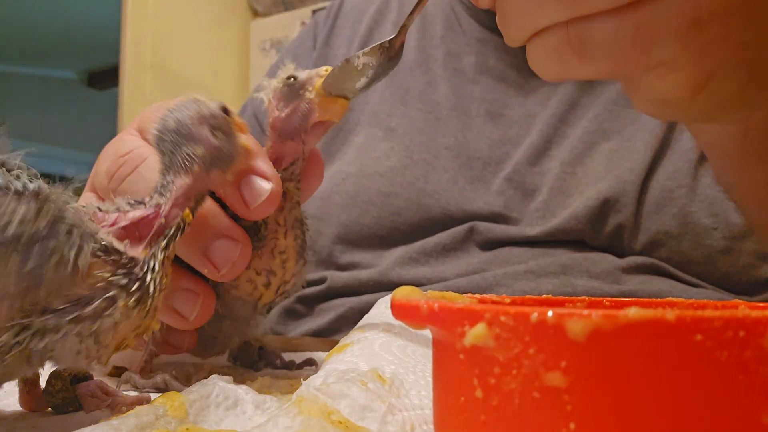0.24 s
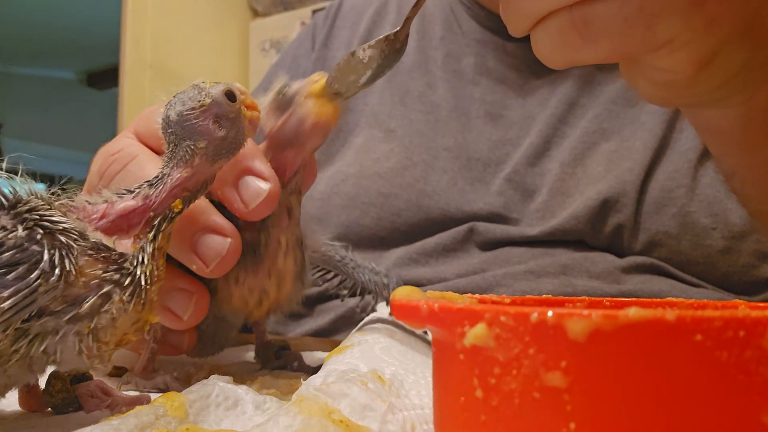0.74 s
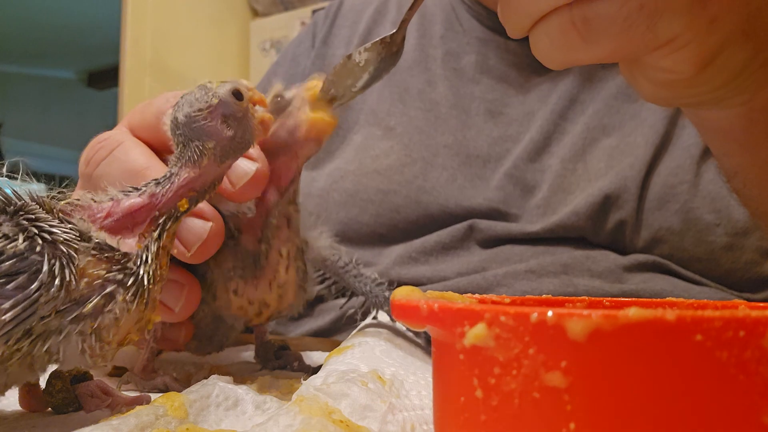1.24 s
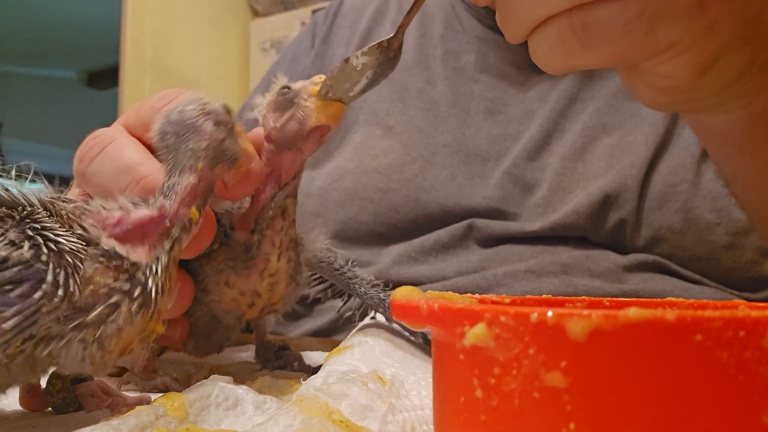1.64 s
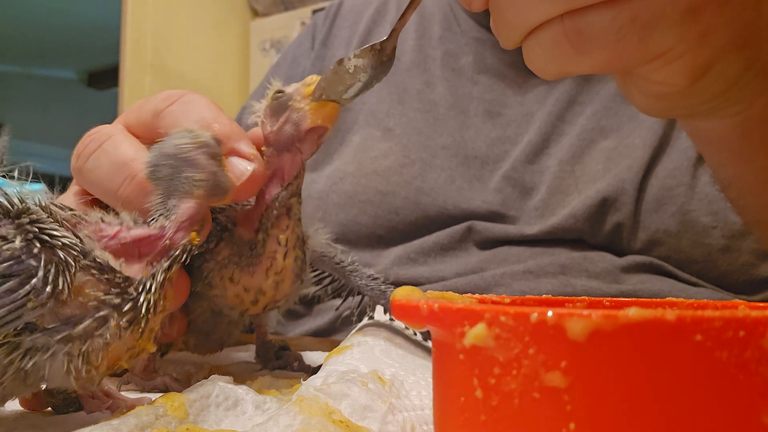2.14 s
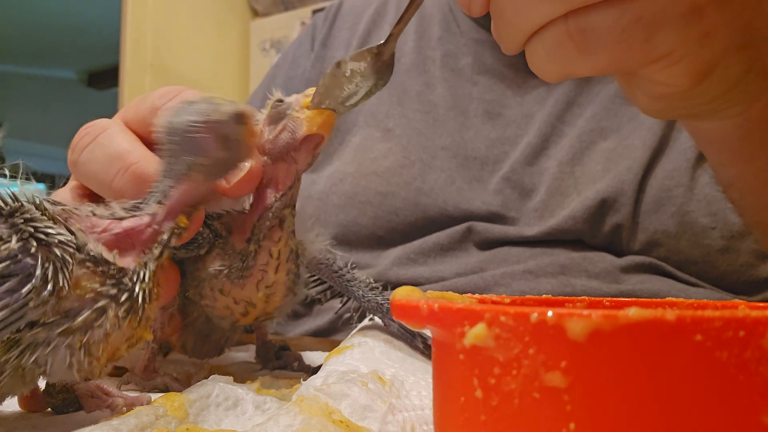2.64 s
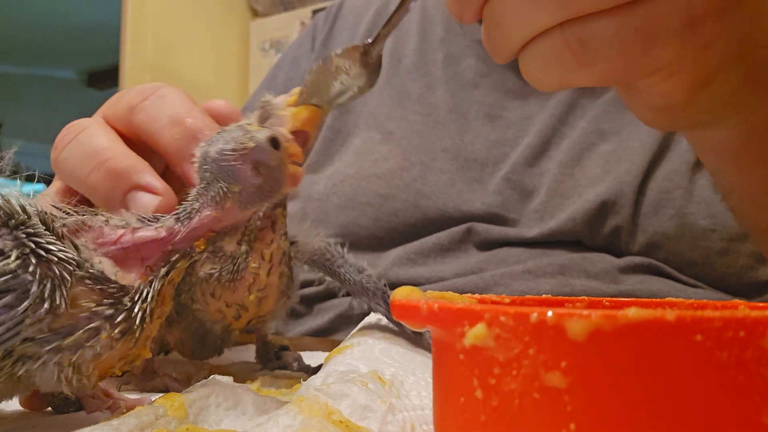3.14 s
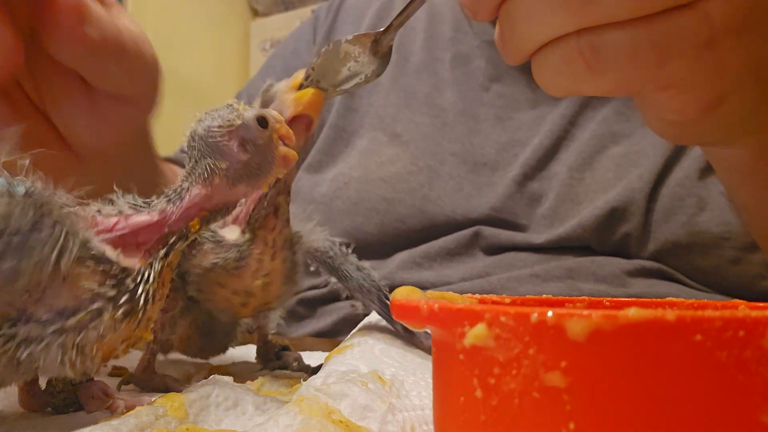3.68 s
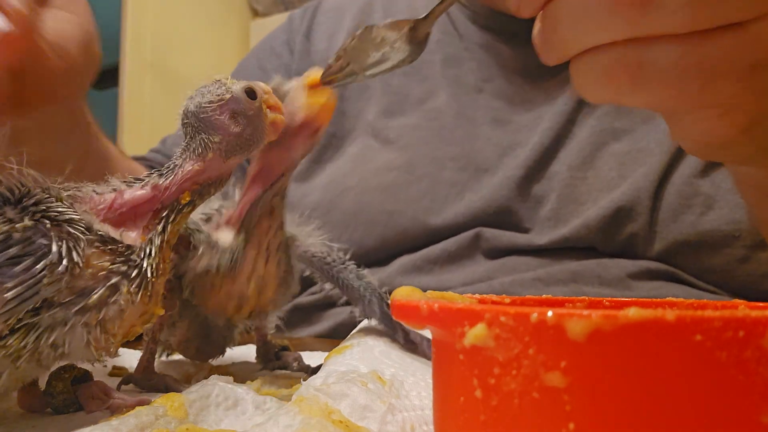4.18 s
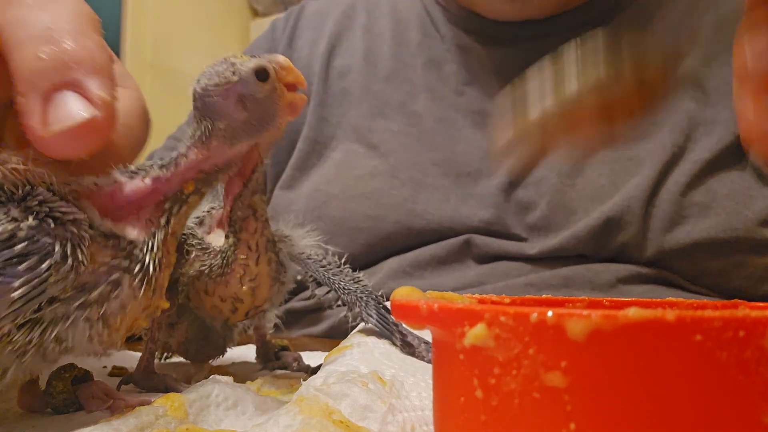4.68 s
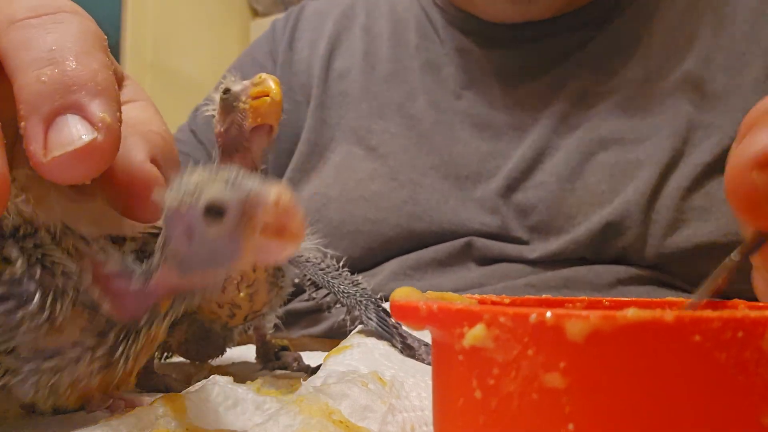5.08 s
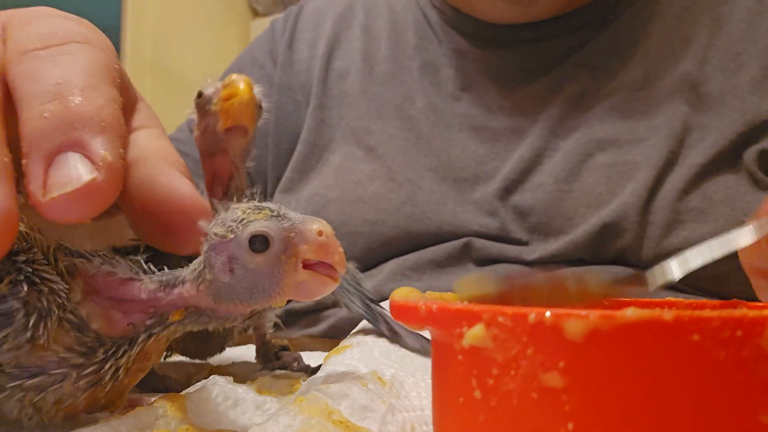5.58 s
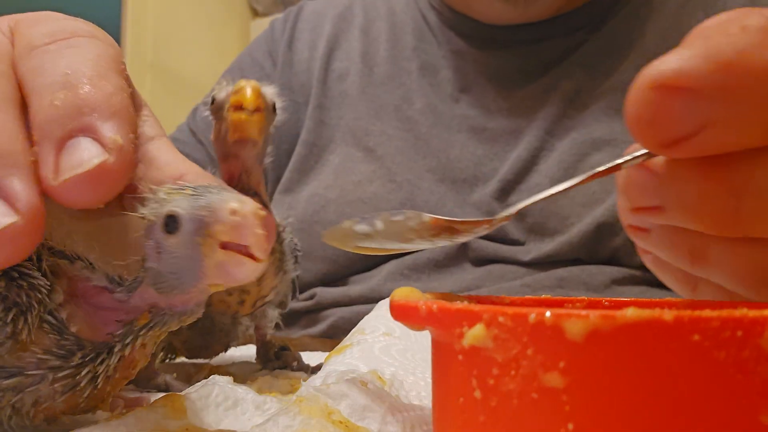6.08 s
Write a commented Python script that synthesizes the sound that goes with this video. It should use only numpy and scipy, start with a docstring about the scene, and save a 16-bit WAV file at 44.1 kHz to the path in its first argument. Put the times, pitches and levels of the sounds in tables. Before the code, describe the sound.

Close stereo pickup at a table where young parrots are spoon-fed. Low unsteady hum and soft room hiss run underneath. One near chick squawks at the start, then three more times at intervals of roughly two seconds, whistle cracking to rasp and back. A stronger rustle with faint peeps comes midway, another later, and light ticks precede the last call. Short, diffuse room reverberation.

```python
"""A parrot chick begs four times close to a phone on a kitchen table: a whistle near 2 kHz, made of harmonic
partials, breaks down into a rasp of air gated once a cycle, and returns. At times the other side of the syrinx
joins and beats with it. Far chicks peep faintly as gliding sines, and paper and spoon make resonant noise
rustles and damped ticks. An appliance hums in wavering lines over the air noise of a small diffuse room."""
import sys
import numpy as np
from scipy import signal
from scipy.fft import rfft, irfft
from scipy.io import wavfile
from scipy.ndimage import uniform_filter1d

SR = 44100
rng = np.random.default_rng(int(sys.argv[2]) if len(sys.argv) > 2 else 0)


def to_wav(s):
    """Save 16-bit WAV."""
    ch = np.atleast_2d(s).T  # columns
    pcm = np.round(np.clip(ch, -1, 1) * 32767)  # PCM
    wavfile.write(sys.argv[1], SR, pcm.astype(np.int16))


N = 278712

# Air noise of the room: frequency_hz, density_db (relative), left_minus_right_db, likeness_of_sides (0-1)
AIR_SPECTRUM = [(25, -15, 19, .9), (60, -25.5, -21.5, 0.6), (129, -4.5, 12, 0), (250, 1, 2, 1),
                (500, -3, 3.5, 0.3), (800, -8, 0.5, 0.5), (1300, -14, -0.5, 0), (2030, -14, 0, 0.18),
                (2780, -18, 0.5, 0), (4640, -18.5, 6.5, 0), (9200, -22.5, 4, 0.07), (8670, -24, 22.5, 0),
                (12000, -51, -11.5, 0.58), (16000, -33.5, 1, 0.08)]
# Bands where the air hiss stands out: frequency_hz, rise_db
HISS_BANDS = [(2150, 4), (4800, 4), (5900, 4), (7700, 3)]
AIR_LEVEL_DB, HISS_BAND_WIDTH_HZ = -50, 150
# Appliance hum lines: frequency_hz, level_db, left_minus_right_db, waver_db
HUM_LINES = [(59.2, -66, 3, 4), (92.7, -57, -6, 3.5), (166.8, -63.5, -1, 3.5), (198.7, -48.5, 1.5, 1.6),
             (397, -70, -1.5, 3)]

# Whistled peeps of far chicks: start_s, length_s, start_hz, end_hz, level_db
FAR_PEEPS = [(.47, .05, 4300, 4500, -67), (.525, .05, 4200, 4400, -67), (.58, .05, 4200, 4400, -68),
             (.62, .14, 4400, 4350, -69), (2.468, .025, 2400, 2400, -58), (2.478, .06, 3850, 3900, -57),
             (2.485, .11, 2850, 3100, -57), (2.515, .025, 5950, 6000, -59), (2.59, .08, 3200, 3200, -64),
             (2.73, .05, 3750, 3700, -64), (2.755, .13, 3050, 3000, -65), (2.825, .04, 2000, 2100, -62),
             (2.87, .09, 2150, 2100, -59), (3.0, .04, 3300, 3300, -63), (4.065, .07, 2200, 2200, -64),
             (4.07, .08, 4700, 4500, -63), (5.21, .045, 3000, 2800, -62), (6.09, .06, 3500, 3200, -67),
             (6.145, .05, 3850, 3750, -62)]
FAR_ROOM_SEND_DB = 15

# Paper and spoon rustles: peak_time_s, rise_s, fall_s (time constants), centre_hz, width_hz, gain_db
RUSTLE_EVENTS = [(0.02, 0.079, 0.024, 4830, 6000, -45), (1.09, 0.065, 0.089, 4070, 2900, -43.5),
                 (1.352, 0.0039, 0.039, 5060, 5700, -43), (2.505, 0.01, 0.12, 3140, 960, -25.5),
                 (2.53, 0.018, 0.027, 7100, 9000, -49), (4.08, 0.014, 0.037, 4375, 1500, -34),
                 (5.051, 0.032, 0.019, 4006, 6900, -40)]
# Ticks and a dull bump: start_s, initial_level_db (peak), ring_hz, t60_s
TICK_EVENTS = [(.53, -42, 80, .12), (1.35, -40, 5600, .012), (4.9472, -37, 1900, .012),
               (4.9472, -40, 7000, .005), (5.266, -44, 6000, .005)]

# Diffuse room tail by band: centre_hz, t60_s, gain_db
ROOM_BANDS = [(690, 0.21, -10.5), (1960, 0.17, -10.5), (4850, 0.2, -6), (10000, 0.13, -9.5)]
# The two microphone ports: frequency_hz, left_minus_right_db, right_lead_rad
PORT_RESPONSE = [(300, -2, .2), (700, -7, .4), (1030, -5, .5), (1400, 0, .8), (2070, 2, .8), (2760, 3, 1.7),
                 (3450, 5, 2.7), (4130, 2, 3.5), (4820, -2, 5.3), (5500, -6, 6.5), (6200, -4, 6.8),
                 (7600, 2, 7), (10300, 2, 6.4), (13000, -7, 8.5)]
NOTCH_HZ, NOTCH_WIDTH_HZ, TOP_HZ = 9720, 2900, 15950

# Syrinx control curves, one list of points a call: time_s, pitch_hz, level_db, brightness_db
CALL_CURVES = [
    [(0.078, 1480, -40.5, -3), (0.09, 1753, -31.5, 11), (0.105, 1849, -19.5, 8.5),
     (0.112, 1679, -24.5, 7.5), (0.126, 1488, -20.5, 9), (0.128, 2144, -23, -12), (0.155, 1915, -22, -10),
     (0.16, 1179, -17, 10.5), (0.17, 832.3, -30.5, 14), (0.188, 1014, -24.5, 10), (0.198, 1790, -20, 7.5),
     (0.203, 2039, -18.5, 7.5), (0.222, 2124, -11.5, 7.5), (0.24, 2008, -16.5, -3.5), (0.27, 2031, -20, -2),
     (0.335, 2035, -15.5, -12.5), (0.355, 2015, -26, -11), (0.364, 1667, -42.5, -5)],
    [(1.645, 1635, -45, 3), (1.658, 1907, -26, 5.5), (1.668, 1999, -19.5, 4.5), (1.682, 2024, -12.5, -0.5),
     (1.71, 2049, -17, -5), (1.728, 2039, -16.5, -7.5), (1.734, 1116, -22, 8), (1.75, 899, -23, 11),
     (1.762, 1040, -21.5, 8), (1.77, 2140, -20.5, 0.5), (1.78, 2211, -13, 1), (1.795, 2233, -17, -12.5),
     (1.803, 2197, -23, -13), (1.82, 2243, -30, -12.5), (1.84, 2185, -21.5, -6), (1.88, 2130, -23, -2),
     (1.9, 2043, -20, 0.5), (1.915, 1657, -39, 0.5)],
    [(3.625, 1400, -49, -24), (3.638, 1725, -28.5, -2.5), (3.646, 1900, -19, 6.5), (3.654, 2014, -16, 7),
     (3.67, 1931, -14, 5), (3.7, 1983, -11, -5), (3.722, 1868, -15.5, -8), (3.727, 1011, -20.5, 9),
     (3.74, 877, -30, 12), (3.748, 1348, -23, -0.5), (3.754, 2005, -21, 12), (3.766, 2144, -15, 7),
     (3.785, 1941, -15.5, 0.5), (3.82, 2028, -18, -1), (3.862, 1994, -24, 3), (3.878, 2030, -27, -4)],
    [(5.25, 1280, -41, -14.5), (5.265, 1771, -28, -14.5), (5.28, 1837, -15.5, -9), (5.3, 1611, -18, 5),
     (5.328, 1317, -18, 8), (5.342, 985.6, -17, 6), (5.356, 841, -19, 5), (5.37, 1014, -21.5, 2.5),
     (5.379, 1790, -19.5, 0), (5.388, 2079, -16, 7), (5.41, 2051, -15, 6.5), (5.42, 2043, -25.5, -4),
     (5.46, 2089, -20, -2.5), (5.495, 2020, -22, 3), (5.52, 1632, -33, 2.5)],
]
# How the head is held in each call: port_delay_factor, beak_resonance_db, treble_db,
# whistle_rasp_before_db, whistle_rasp_after_db (rasp under the whistle, before and after the lowest pitch)
HEAD_POSES = [(1, -8.5, -7.5, -16.5, -26), (1, -3.5, -5.5, -21, -21), (1.3, -8, 3.5, -32, -25.5),
              (1.8, 14.5, -12.5, -21, -12)]
BEAK_HZ, BEAK_WIDTH_HZ, TREBLE_HZ = 5420, 700, 6900
# Windpipe and beak colour of partials from the third up: frequency_hz, gain_db
THROAT_COLOUR = [(2000, -37), (3100, 2.5), (4300, 3), (5300, 0.5), (6200, -10), (7100, -8), (8200, -2.5),
                 (12000, 0), (16000, -9.5)]
# Windpipe and beak colour of the rasp and the mixed tones: frequency_hz, gain_db
RASP_COLOUR = [(400, -20), (900, -9), (1500, -5.5), (2200, -2.5), (3200, 3), (4300, 2.5), (5300, -3),
               (6500, -14.5), (8000, -9.5), (12000, -1.5), (16000, -28)]
# Second partial against the fundamental, by where it falls in the windpipe: frequency_hz, gain_db
SECOND_PARTIAL_COLOUR = [(1700, -11.5), (2150, -3), (2500, -14.5), (3200, 2.5), (3700, -13), (4050, -11),
                         (4400, -4.5)]
SECOND_PER_BRIGHT_DB, UPPER_DB, UPPER_PER_BRIGHT_DB = 0.7073, -17.5, 1.76
# The rasp grows as the pitch falls below the whistle
BREAK_HZ, BREAK_SPAN_HZ, BREAK_RASP_DB = 1710, 690, -4
# Catches where the voice falters and air bursts through:
# time_s, fundamental_dip_db (a negative dip raises it), burst_level_db
VOICE_CATCHES = [(0.114, 9, -31), (.161, 2.5, -25.5), (.171, -5.5, -22.5), (1.691, 12, -29),
                 (1.703, 10.5, -36.5), (1.797, 3, -23.5), (3.706, 9.5, -23), (3.721, 7, -31),
                 (5.331, 17.5, -30.5), (5.373, 2, -32.5), (5.41, -0.5, -27)]
CATCH_WIDTH_S = .0025
HALF_LINES_DB = -3.5  # lines at odd halves of the pitch, against the burst

# Other side of the syrinx: start_s, glide_start_s, end_s, start_hz, end_hz,
# fundamental_db, second_partial_db, mixed_tones_db
SECOND_SIDE = [(.232, 0.271, .33, 2745, 3202, -39, -51, -42.5),
               (1.784, 1.792, 1.806, 3036, 2390, -31.5, -50, -54),
               (1.805, 1.818, 1.9, 2517, 3150, -37.5, -56, -44.5),
               (5.405, 5.419, 5.505, 2710, 2738, -62, -39.5, -45)]
SIDE_PEAK_HZ, SIDE_PEAK_WIDTH_HZ, SIDE_PEAK_DB = 3007, 85, 9  # resonance that its pitch may cross


def undb(db):
    """Level definition: amplitude ratio of a level in dB."""
    return 10 ** (np.asarray(db) / 20)


def on_log(hz, table, axis=1):
    """Logarithmic frequency scale: interpolate a column of a table whose first column is Hz."""
    table = np.array(table, float)
    return np.interp(np.log(np.maximum(hz, 1)), np.log(table[:, 0]), table[:, axis])


def colour(x, table):
    """Linear filtering: weight the spectrum by (Hz, dB) points, then normalize to unit rms."""
    hz = np.arange(len(x) // 2 + 1) * SR / len(x)
    y = irfft(rfft(x) * undb(on_log(hz, table)), len(x))
    return y / np.std(y)


def walk(rate, size=N):
    """Random modulation: levels held for 1 / rate s, smoothed twice, with unit spread."""
    hold = max(int(SR / rate), 1)
    steps = np.repeat(rng.standard_normal(size // hold + 2), hold)
    y = uniform_filter1d(uniform_filter1d(steps, hold), hold)[:size]
    return y / np.std(y)


def spread(rows):
    """Control curves: sample indices of a time table and its other columns interpolated over them."""
    s, *columns = np.transpose(rows)
    at = np.arange(int(s[0] * SR), int(s[-1] * SR))
    return at, [np.interp(at / SR, s, column) for column in columns]


def bump(x, centre, width):
    """Gaussian weighting: one at the centre, 1/e one width away."""
    return np.exp(-((x - centre) / width) ** 2)


def tone(phase, db):
    """Simple harmonic motion: a sine of rms level db."""
    return np.sqrt(2) * undb(db) * np.sin(phase)


def fade(at):
    """Gradual onset and release: linear 4 ms edges limit spectral splatter."""
    return np.minimum(1, np.minimum(at - at[0], at[-1] - at) / (.004 * SR))


def room_air():
    """Partial coherence: shared and opposed noise mix to set the likeness of the two sides in each band."""
    hz, sides = np.arange(N // 2 + 1) * SR / N, np.array([[1], [-1]])
    like = np.clip(on_log(hz, AIR_SPECTRUM, axis=3), 0, 1)
    mid = rfft(rng.standard_normal(N)) * np.sqrt(1 + like)
    side = rfft(rng.standard_normal(N)) * np.sqrt(1 - like)
    peaks_db = sum(db * bump(hz, peak_hz, HISS_BAND_WIDTH_HZ) for peak_hz, db in HISS_BANDS)
    balance_db = sides * on_log(hz, AIR_SPECTRUM, axis=2) / 2
    shape = undb(on_log(hz, AIR_SPECTRUM) + peaks_db + balance_db)
    air = irfft((mid + sides * side) * shape, N)
    return air * undb(AIR_LEVEL_DB + 0.48 * walk(2.924)) / np.std(air)


def appliance():
    """Line spectrum with slow modulation: each hum line wavers in pitch and level."""
    out, sides = np.zeros((2, N)), np.array([[1], [-1]])
    for line_hz, db, pan_db, waver_db in HUM_LINES:
        turn = np.cumsum(2 * np.pi * line_hz * (1 + .006 * walk(14)) / SR)
        out += tone(turn, db + waver_db * walk(21) + sides * pan_db / 2)
    return out


def far_chicks():
    """Frequency and amplitude modulation: short whistles glide with wobbling pitch and broken level."""
    out = np.zeros(N)
    for s, length, start_hz, end_hz, db in FAR_PEEPS:
        at = np.arange(int(max(s, 0) * SR), min(int((s + length) * SR), N))
        hz = np.linspace(start_hz, end_hz, len(at)) * (1 + .025 * walk(400, size=len(at)))
        level_db = db + 3. * walk(120, size=len(at))
        out[at] += np.hanning(len(at)) * tone(np.cumsum(2 * np.pi * hz / SR), level_db)
    return out


def rustles():
    """Resonance driven by noise: grainy friction passes two equal resonators, swells and fades."""
    out, t = np.zeros(N), np.arange(N) / SR
    for s, rise, fall, hz, width, db in RUSTLE_EVENTS:
        grain = rng.standard_normal(N) * undb(0.67 * walk(600))
        b, a = signal.iirpeak(hz, hz / width, SR)
        friction = signal.lfilter(b, a, signal.lfilter(b, a, grain))
        swell = np.exp(np.where(t < s, (t - s) / rise, (s - t) / fall))
        out += undb(db) * swell * friction
    return out


def ticks():
    """Free damped vibration: a struck body rings at one frequency and dies away exponentially."""
    out, t = np.zeros(N), np.arange(N) / SR
    for s, db, hz, t60 in TICK_EVENTS:
        after = np.maximum(t - s, 0)
        out += undb(db) * np.sin(2 * np.pi * hz * after) * np.exp(-np.log(1000) * after / t60)
    return out


def room(x):
    """Diffuse reverberation: broad bands of noise die away, unrelated on the two sides."""
    t, tail = np.arange(SR // 2) / SR, 0
    for hz, t60, db in ROOM_BANDS:
        sos = signal.butter(2, [hz / 1.5, hz * 1.5], "band", fs=SR, output="sos")
        band = signal.sosfilt(sos, rng.standard_normal((2, len(t))))
        decay = np.exp(-np.log(1000) * t / t60) * (t > .004)  # silent for the first 4 ms
        tail = tail + undb(db) * band * decay / np.sqrt(np.sum(decay ** 2))
    return signal.fftconvolve(x[None], tail)[:, :N]


def ports(x, delay=1, beak_db=0, treble_db=0):
    """Diffraction and directivity: the phone body colours and delays each port; the beak's aim tilts the treble."""
    hz, sides = np.arange(N // 2 + 1) * SR / N, np.array([[1], [-1]])
    beak = beak_db * bump(hz, BEAK_HZ, BEAK_WIDTH_HZ)
    treble = treble_db / (1 + (TREBLE_HZ / (hz + 1)) ** 8)
    balance_db = sides * on_log(hz, PORT_RESPONSE) / 2
    lead = np.exp(-.5j * sides * delay * on_log(hz, PORT_RESPONSE, axis=2))
    return irfft(rfft(x) * undb(beak + treble + balance_db) * lead, N)


def second_side(phase):
    """Nonlinear coupling: the two sides beat and pair their beats; mixed tones stand half the pitch gap apart."""
    out = np.zeros(N)
    for start, climb, end, low_hz, high_hz, db, second_db, mix_db in SECOND_SIDE:
        at, (hz,) = spread([(start, low_hz), (climb, low_hz), (end, high_hz)])
        first_db = db + SIDE_PEAK_DB * bump(hz, SIDE_PEAK_HZ, SIDE_PEAK_WIDTH_HZ)
        turn = np.cumsum(2 * np.pi * hz * (1 + .004 * walk(300, size=len(at))) / SR)
        flutter = 4. * walk(600, size=len(at))
        side = tone(turn, first_db + flutter) + tone(2 * turn, second_db + flutter)
        half_gap = (turn - phase[at]) / 2
        for m in range(4):
            for n in (-2, -1, 1, 2, 3):
                mixed = m * phase[at] + n * half_gap
                mixed_hz = np.abs(uniform_filter1d(np.gradient(mixed), size=64)) * SR / (2 * np.pi)
                mixed_db = mix_db + on_log(mixed_hz, RASP_COLOUR) + 4. * walk(90, size=len(at))
                side += tone(mixed, mixed_db)
        out[at] += side * fade(at)
    return out


def snap(rows):
    """Period doubling: a pitch fall beyond a ratio of 1.5 is a sudden pairing of cycles, not a glide."""
    out = [rows[0]]
    for row in rows[1:]:
        if row[1] < out[-1][1] / 1.5:
            out.append((row[0] - .0008, out[-1][1], *row[2:]))  # hold the pitch until 0.8 ms before
        out.append(row)
    return out


def chick():
    """Self-sustained oscillation: syrinx partials share one phase, and each cycle gates a puff of air."""
    out, phase = np.zeros(N), np.zeros(N)
    catch_s, catch_dip_db, catch_burst_db = np.transpose(VOICE_CATCHES)
    for rows, (_, _, _, before_db, after_db) in zip(CALL_CURVES, HEAD_POSES):
        at, (hz, db, bright_db) = spread(snap(rows))
        db, bright_db = (uniform_filter1d(curve, size=130) for curve in (db, bright_db))
        catch = bump(at[:, None] / SR, catch_s, CATCH_WIDTH_S)
        first_db = db - catch @ catch_dip_db
        second_db = db + on_log(2 * hz, SECOND_PARTIAL_COLOUR) + SECOND_PER_BRIGHT_DB * bright_db
        upper_db = db + UPPER_DB + UPPER_PER_BRIGHT_DB * bright_db

        broken = np.clip((BREAK_HZ - hz) / BREAK_SPAN_HZ, 0, 1)  # 0 whistle, 1 rasp
        whistle_db = np.where(at < at[np.argmin(hz)], before_db, after_db)
        burst = catch @ undb(catch_burst_db)
        rasp = undb(db + broken * BREAK_RASP_DB + (1 - broken) * whistle_db) + burst

        rough = np.clip(rasp / undb(first_db), 0, 1) ** 2  # the more rasp, the less even the cycles
        jitter = .055 * rough * walk(700, size=len(at))
        turn = np.cumsum(2 * np.pi * hz * (1 + jitter) / SR)
        shake = 0.6 * rough * walk(500, size=len(at))
        voice = tone(turn, first_db + shake + 0.56 * walk(70, size=len(at)))
        voice += tone(2 * turn, second_db + shake)
        for k in range(3, 18):
            shimmer = shake + 0.97 * walk(210, size=len(at))
            partial_db = upper_db + shimmer + on_log(k * hz, THROAT_COLOUR) - 4.3 * (k - 3)
            voice += (k * hz < TOP_HZ) * tone(k * turn + k, partial_db)

        # in a catch the cycles pair up
        for k in range(3):
            half_db = HALF_LINES_DB + on_log((k + .5) * hz, RASP_COLOUR)
            voice += burst * tone((k + .5) * turn, half_db)
        puffs = rng.standard_normal(len(at)) * np.exp(2. * np.cos(turn))
        voice += rasp * undb(3.5 * walk(250, size=len(at))) * colour(puffs, RASP_COLOUR)
        out[at] += voice * fade(at)
        phase[at] = turn
    return out + second_side(phase)


def scene():
    """Superposition: near sources reach the ports directly and by the room; far chicks are mostly room."""
    far, near, voice = far_chicks(), rustles() + ticks(), chick()
    t, calls = np.arange(N) / SR, 0
    for rows, (delay, beak_db, treble_db, _, _) in zip(CALL_CURVES, HEAD_POSES):
        sounding = (t >= rows[0][0]) * (t <= rows[-1][0])
        calls = calls + ports(voice * sounding, delay, beak_db, treble_db)
    direct = calls + ports(near) + ports(far, delay=0.048)
    tail = room(voice + near + undb(FAR_ROOM_SEND_DB) * far)
    return direct + tail + room_air() + appliance()


def record(dry):
    """Transducer response: the microphone has a dip near 10 kHz and a steep cut at the top."""
    b, a = signal.iirnotch(NOTCH_HZ, NOTCH_HZ / NOTCH_WIDTH_HZ, SR)
    top_cut = signal.ellip(12, .2, 110, TOP_HZ, fs=SR, output="sos")
    return signal.sosfilt(top_cut, signal.lfilter(b, a, dry))


dry = scene()
out = record(dry)
to_wav(out)
```